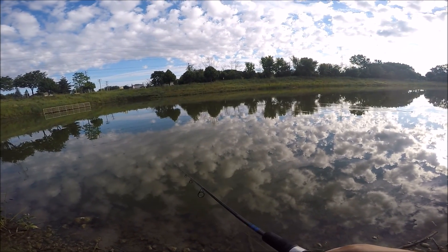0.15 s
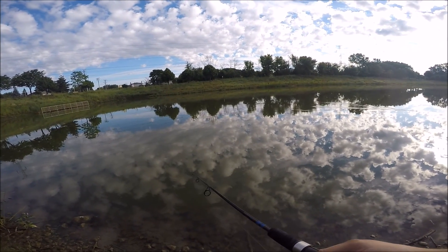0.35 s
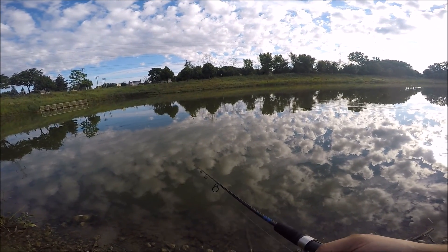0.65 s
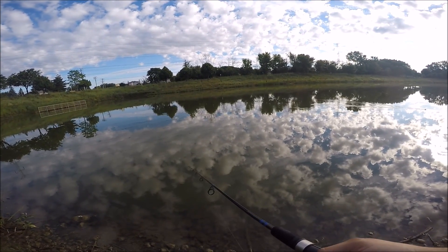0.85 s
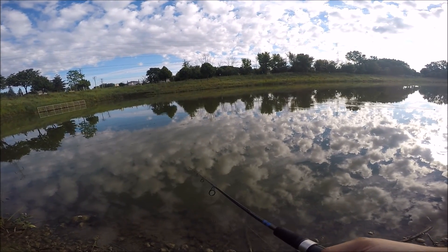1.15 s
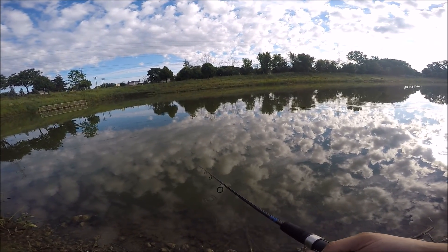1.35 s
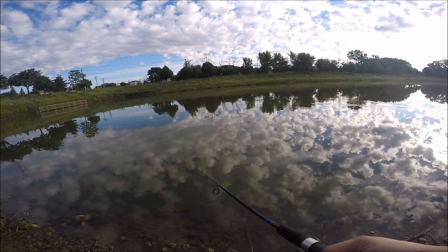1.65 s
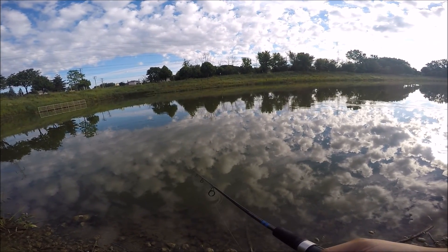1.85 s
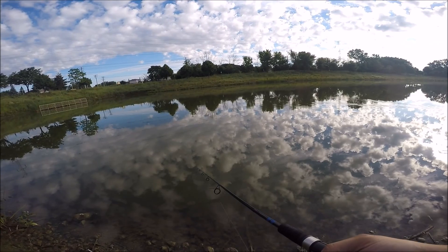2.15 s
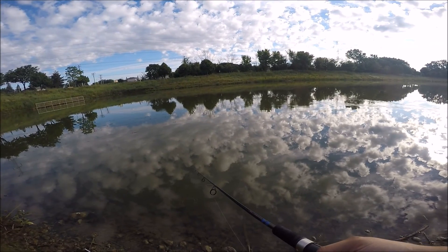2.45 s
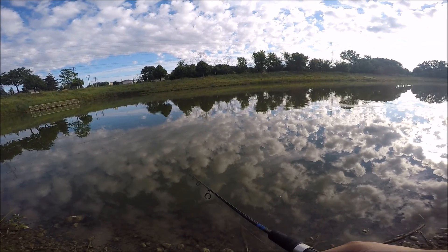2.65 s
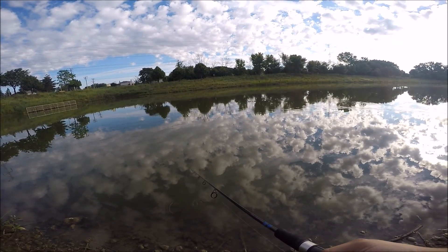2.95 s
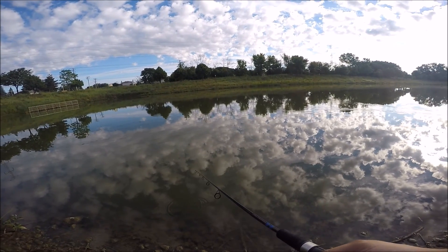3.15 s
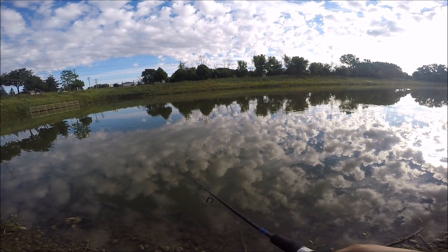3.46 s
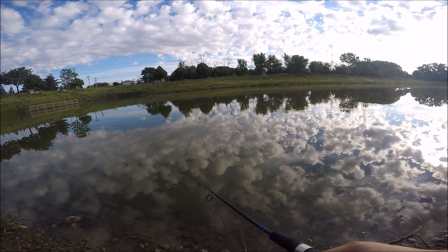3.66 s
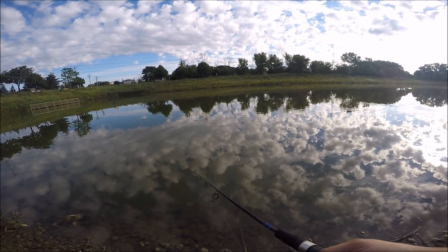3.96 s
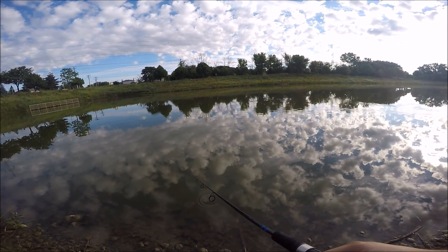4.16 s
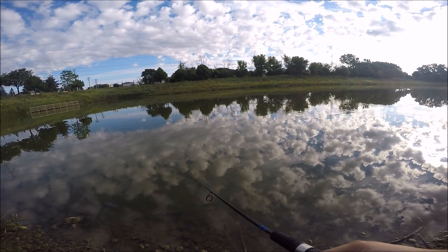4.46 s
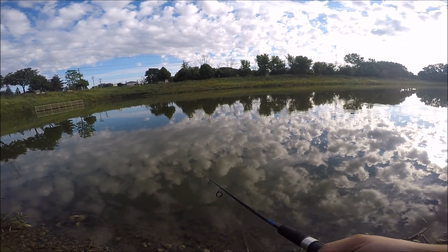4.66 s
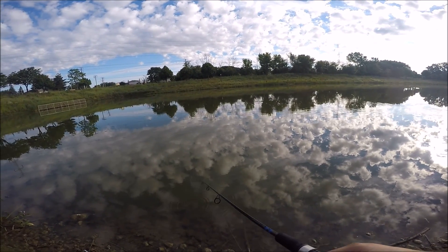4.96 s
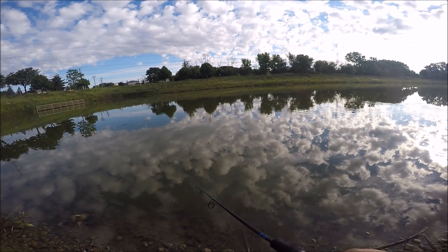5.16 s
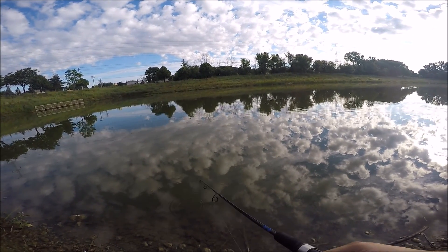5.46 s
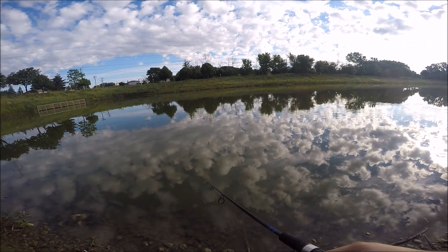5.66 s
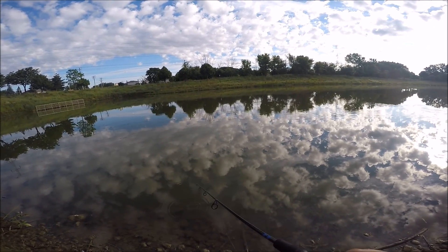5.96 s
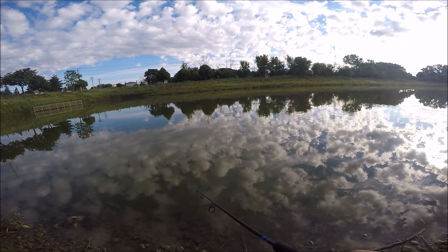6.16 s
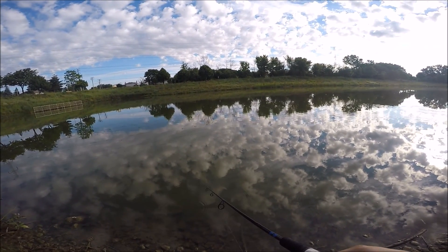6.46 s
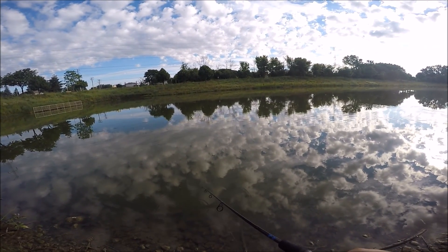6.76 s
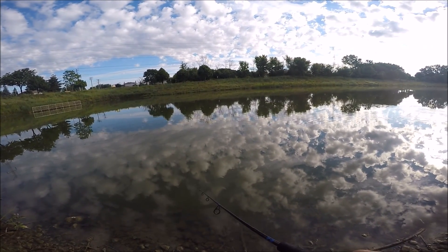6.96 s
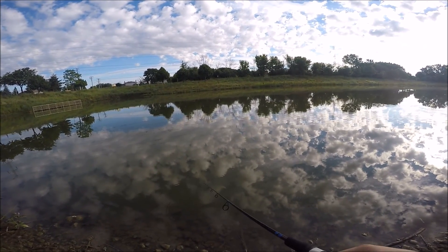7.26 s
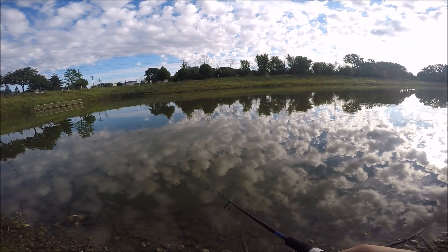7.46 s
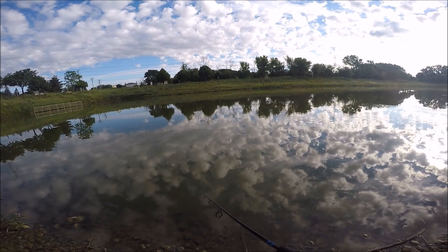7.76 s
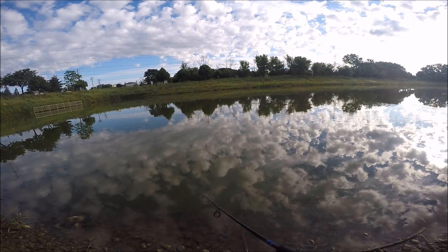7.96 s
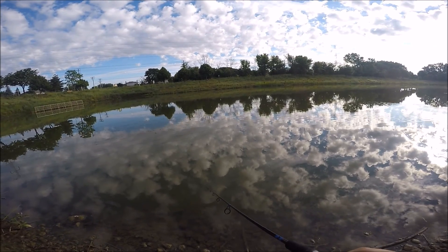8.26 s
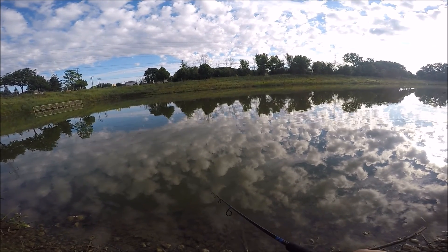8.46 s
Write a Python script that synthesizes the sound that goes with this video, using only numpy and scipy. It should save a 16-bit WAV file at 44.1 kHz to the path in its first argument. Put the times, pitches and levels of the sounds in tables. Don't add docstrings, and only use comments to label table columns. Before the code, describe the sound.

Crickets chirp steadily over a dense insect chorus by a still pond, with a distant bird's falling phrase, low road rumble and small rod ticks.

```python
import sys
import numpy as np
from scipy import signal
from scipy.fft import rfft, irfft, next_fast_len
from scipy.io import wavfile
from scipy.ndimage import uniform_filter1d, map_coordinates

SR = 44100
rng = np.random.default_rng(int(sys.argv[2]) if len(sys.argv) > 2 else 0)


def to_wav(s):
    ch = np.atleast_2d(s).T
    pcm = np.round(np.clip(ch, -1, 1) * 32767)
    wavfile.write(sys.argv[1], SR, pcm.astype(np.int16))


def volts(x):
    e = np.asarray(x, float) / 20
    return 10 ** e


N = 380141

# (time [s], top pitch [Hz], level [dB])
STEADY_CHIRPS = [(.395, 7350, -74), (.785, 7380, -72), (1.18, 7400, -71), (1.98, 7380, -72),
                 (2.4, 7340, -69), (2.835, 7390, -71), (3.246, 7520, -68), (3.69, 7380, -72),
                 (4.091, 7450, -69), (4.485, 7500, -69), (4.96, 7400, -67), (5.41, 7400, -69),
                 (5.865, 7520, -67.5), (6.319, 7490, -67.5), (6.756, 7520, -67), (7.18, 7560, -68),
                 (7.595, 7550, -69), (8.01, 7570, -66.5), (8.422, 7540, -67)]
# (time [s], length [s], top pitch [Hz], level [dB])
FITFUL_CHIRPS = [(.01, .12, 7200, -75), (.235, .05, 7200, -70), (.605, 0.055, 7250, -66),
                 (.685, .13, 7220, -69), (1.005, .05, 7200, -70), (1.361, .14, 7200, -66),
                 (2.475, 0.13, 7110, -69), (3.15, .14, 7170, -72), (4.165, .12, 7170, -72),
                 (4.903, .11, 7180, -72), (5.611, .07, 6730, -67), (7.384, .066, 6750, -67),
                 (7.95, 0.066, 6720, -68), (8.28, .058, 7350, -76), (8.49, .077, 6780, -66),
                 (8.583, .035, 6900, -73)]
# (frequency [Hz], density [dB per Hz])
FAR_CRICKET_SPECTRUM = [(3500, -30), (3950, -12), (4250, -8.5), (4560, -3), (4850, -6), (5050, -5.5),
                        (5250, -2.5), (5800, -9), (6200, -2.5), (6600, -4.5), (7000, -9), (7400, -12),
                        (7800, -15.5), (8300, -57)]
# (time [s], level [dB])
SONGS = [
    (.95, -55.5),
    (2.265, -54.5),
    (4.513, -56.5),
    (6.172, -58.5),
    (7.995, -57.5),
]
# (time from its start [s], length [s], start pitch [Hz], end pitch [Hz], level [dB])
PHRASE = [(.038, .007, 3400, 4000, -12), (.045, 0.0085, 4360, 5050, 2), (.055, .017, 5010, 4496, 5.5),
          (.070, 0.0153, 4244, 3370, -1.5), (.083, .009, 3370, 3950, -4), (.093, .008, 2750, 3100, -5),
          (.104, .02, 3320, 4050, 0.5), (.123, .012, 4100, 3300, -1.5), (.136, .011, 3100, 2640, -6),
          (.143, .007, 3300, 3700, -5), (.151, 0.0112, 2594, 3150, -2.5), (.163, .011, 3000, 2600, -9)]
# (time [s], length [s], start pitch [Hz], end pitch [Hz], level [dB])
WHISTLES = [
    (1.3, .43, 7450, 7270, -76),
    (1.83, .26, 7270, 7330, -73),
    (2.31, .083, 7300, 7260, -83),
]
# (time [s], length [s], start pitch [Hz], end pitch [Hz], level [dB])
PEEPS = [
    (1.828, .016, 2780, 2840, -60),
    (4.004, .014, 2970, 2870, -67),
    (4.862, 0.03, 2460, 2520, -65.5),
    (5.248, .014, 2660, 3050, -61),
]
# (time [s], peak level [dB], pitch [Hz], decay by 20 dB [s])
ROD_TICKS = [
    (1.5499, -47.5, 2570, 0.0035),
    (1.713, -54, 1550, 0.0044),
    (1.72, -55, 2400, .004),
    (2.209, -50, 900, .006),
    (5.0627, -58, 1720, 0.0037),
    (6.4953, -43, 2880, 0.0038),
]
# (time [s], peak level [dB], pitch [Hz], decay by 20 dB [s])
LINE_SNAPS = [
    (1.7559, -55, 13100, 0.0019),
    (3.9105, -61, 11000, 0.002),
    (6.551, -53, 9470, 0.002),
]
# (time [s], peak level [dB], pitch [Hz], decay by 20 dB [s])
GRIP_KNOCK = [
    (3.9079, -39.5, 1943, 0.0046),
    (3.911, -38, 1840, 0.002),
    (3.9095, -52, 1000, .005),
    (3.9112, -41.5, 390, .008),
    (3.9085, -51, 2960, 0.0027),
    (3.911, -48, 13000, 0.0022),
]
# (frequency [Hz], drift [Hz])
PUMP_LINES = [
    (45, 0.883),
    (179, 2.08),
    (372, 4.94),
]
PUMP_LEVELS = [-52.5, -66, -69]
# (time [s], half width [s], rise [dB])
PUMP_SURGES = [
    [(.17, .5, -2), (1.94, .3, 6), (2.93, .2, 6), (4.7, .4, 5), (5.64, .4, 7), (7.1, .8, 6), (8.3, .4, 13)],
    [(1.1, .4, 10), (2.0, .4, 8), (2.73, 0.28, 13), (4.7, 0.19, 12), (5.38, .3, 8.5), (6.26, 0.49, 12),
     (7.32, 0.29, 15), (8.2, 0.43, 12)],
    [(.17, .5, 6), (1.34, .4, 4.5), (3.9, 1.0, 8), (5.3, 0.54, 9), (8.38, .2, 6)],
]
# (frequency [Hz], density [dB per Hz])
RUMBLE_SPECTRUM = [(8.8, -58), (15, -12.5), (32, 1), (49, 1.5), (130, -13.5), (170, -33), (290, -120)]
# (frequency [Hz], density [dB per Hz])
ENGINE_SPECTRUM = [(59, -14), (100, -1.5), (150, -5), (183, -4.5), (298, -9), (363, -12), (457, -13),
                   (620, -30), (810, -69), (1360, -120)]
# (frequency [Hz], density [dB per Hz])
TYRE_SPECTRUM = [(350, -66), (520, -1), (650, 1), (900, -0.5), (1100, -2.5), (1500, -36)]
# (time [s], rise [dB])
WHEEL_BUMPS = [
    (.43, 3.5),
    (.89, 6),
    (1.37, 3),
    (1.92, 10),
    (2.88, 6),
    (4.05, 2.5),
    (5.91, 2.5),
    (7.37, 4.5),
    (8.04, 5),
]
# (time [s], level [dB])
CAR_PASS = [
    (0, -67.5),
    (1.4, -66),
    (2.54, -63.5),
    (3.5, -64.5),
    (4.9, -63.5),
    (5.54, -67.5),
    (6.1, -65.5),
    (6.9, -68),
    (8.62, -67),
]
# (frequency [Hz], density [dB per Hz])
AIR_SPECTRUM = [(530, -15), (900, -14.5), (1260, 1), (1430, 0.5), (1740, -5.5), (2290, -8.5), (2480, -7.5),
                (3910, -11.5), (4200, -8.5), (5460, -15.5), (9240, -120)]
# (frequency [Hz], density [dB per Hz])
HISS_SPECTRUM = [(3000, -60), (4200, 4), (7900, 3.5), (9000, 2), (10500, 0.5), (12500, -0.5), (14000, 0.5),
                 (15300, -2.5)]
GAP_TIMES = [1.426, 2.215, 4.883, 6.013, 8.573]


def unit(x):
    return x / np.sqrt(np.mean(x ** 2) + 1e-20)


def wobble(rate):
    return map_coordinates(rng.standard_normal(2500), [np.arange(N) * rate / SR])


def swells(rows):
    t = np.arange(N) / SR
    return sum(db * np.exp(-2 * ((t - s) / half) ** 2) for s, half, db in rows)


def shape(points):
    f, db = np.transpose(points)
    return lambda hz: volts(np.interp(np.log(hz + 1), np.log(f + 1), db, -120, -120))


def noise(gain, patchy_db):
    z = signal.stft(rng.standard_normal(N + 8192), nperseg=512)[2]
    patches = uniform_filter1d(rng.standard_normal(z.shape), size=5, axis=0)
    patches = uniform_filter1d(patches, size=12, axis=1)
    x = signal.istft(z * volts(patchy_db * unit(patches)), nperseg=512)[1]
    m = next_fast_len(len(x))
    coloured = irfft(rfft(x, m) * gain(np.fft.rfftfreq(m, 1 / SR)), m)
    return unit(coloured[4096:4096 + N])


def scatter(starts, grains):
    at = np.round(np.asarray(starts) * SR).astype(int)[:, None] + np.arange(grains.shape[1])
    keep = (at >= 0) & (at < N)
    return np.bincount(at[keep], grains[keep], N)


def bank_echo(x, t60, db):
    t = np.arange(SR // 2) / SR
    tail = rng.standard_normal(len(t)) * volts(-60 * t / t60)
    return x + volts(db) * signal.fftconvolve(x, tail / np.linalg.norm(tail))[:N]


def strokes(starts, hz, db, length, fall):
    u = np.arange(round(length * SR)) / (length * SR)
    first_phase = rng.random((len(starts), 1))
    turns = first_phase + hz[:, None] * length * (u + fall * (u - u * u) / 2)
    return scatter(starts, volts(db)[:, None] * np.sin(np.pi * u) * np.sin(2 * np.pi * turns))


def near_crickets():
    chirps = [(s, .088, hz, 230, db) for s, hz, db in STEADY_CHIRPS]
    chirps += [(s, length, hz, 50, db) for s, length, hz, db in FITFUL_CHIRPS]
    rows = []
    for s, length, top_hz, arch_hz, db in chirps:
        u = np.arange(0, length - .004, .0122) / length
        luck = rng.standard_normal((2, 20))[:, :len(u)]
        pitch = top_hz - arch_hz * (2 * u - 1) ** 2 + 30 * luck[0]
        swell_db = -26 * (u - .45) ** 2
        rows += zip(s + u * length, pitch, db + 8.0 + swell_db + 0.99 * luck[1])
    return bank_echo(strokes(*np.transpose(rows), length=.008, fall=.045), .15, -7)


def crowd(count, hz, spread_hz, rate, pulses, period, length, fall):
    who = rng.standard_normal((count, 4))
    chirp = np.arange(-1, 30)[None, :, None]
    chirp_start = period * (who[:, :1, None] + chirp * (1 + .1 * who[:, 1:2, None]))
    start = chirp_start + np.arange(pulses) / rate
    luck = rng.standard_normal((2,) + start.shape)
    pitch = hz + spread_hz * np.linspace(-1.6, 1.6, count)[:, None, None] + 70 * luck[0]
    level = 2.8 * who[:, 3:, None] + 3.0 * luck[1]
    return unit(strokes(start.ravel(), pitch.ravel(), level.ravel(), length, fall))


def chorus():
    low = crowd(count=30, hz=4580, spread_hz=165, rate=19.5, pulses=4, period=.42, length=.022, fall=.07)
    high = crowd(count=24, hz=6437, spread_hz=230, rate=82, pulses=8, period=.45, length=0.0085, fall=0.039)
    far = volts(-64.5 + .4 * wobble(1.96)) * noise(shape(FAR_CRICKET_SPECTRUM), patchy_db=0.2)
    return far + volts(-71) * bank_echo(low, 0.22, -2.1) + volts(-73) * bank_echo(high, 0.27, -7.0)


def glides(rows, shift, db, edge):
    out = np.zeros(N + SR)
    for s, length, start_hz, end_hz, level in rows:
        u = np.arange(round(length * SR)) / (length * SR)
        tone = np.sin(2 * np.pi * np.cumsum(start_hz + (end_hz - start_hz) * u) / SR)
        out[round((s + shift) * SR):][:len(u)] += volts(db + level) * np.sin(np.pi * u) ** edge * tone
    return out[:N]


def song(s, db):
    phrase = glides(PHRASE, s, db, edge=0.64)
    slap = glides(PHRASE, s + .035, db - 16.0, edge=0.56)
    flutter = volts(1.5 * wobble(200))
    return bank_echo((phrase + slap) * flutter, .05, -5)


def song_rasp():
    t = np.arange(N) / SR
    puffs = sum(np.clip(1 - np.abs(t - s - .027) / 0.02, 0, 1) * volts(db - 10) for s, db in SONGS)
    return puffs * noise(lambda f: 1 / np.hypot(1, (f - 5350) / 300) ** 3, 0)


def birds():
    thin = glides(WHISTLES, 0, 3, edge=.3) + glides(PEEPS, 0, 0, edge=0.66)
    thin = thin * volts(3.3 * wobble(25.1))
    far = bank_echo(sum(song(s, db) for s, db in SONGS) + song_rasp(), .3, -8)
    return far + bank_echo(thin, 0.16, -9)


def rod():
    s, db, hz, decay_s = np.transpose(ROD_TICKS + LINE_SNAPS + GRIP_KNOCK)[..., None]
    t = np.arange(SR // 20) / SR
    ring = np.sin(2 * np.pi * hz * t)
    ring = ring + 0.78 * np.sin(2 * np.pi * 0.783 * hz * t) + 0.25 * np.sin(2 * np.pi * 1.26 * hz * t)
    onset = (1 - np.exp(-t / 0.00031)) ** 2
    return scatter(s[:, 0], volts(db + 4 - 60 * t / (3 * decay_s)) * onset * ring)


def pump_tone(hz, drift_hz):
    return np.sqrt(2) * np.sin(2 * np.pi * np.cumsum(hz + drift_hz * wobble(6)) / SR)


def pump():
    lines = zip(PUMP_LINES, PUMP_LEVELS, PUMP_SURGES)
    return sum(volts(db - 3 + swells(surges)) * pump_tone(*line) for line, db, surges in lines)


def road():
    t = np.arange(N) / SR
    rumble_db = -44 + swells([(s, 0.077, db) for s, db in WHEEL_BUMPS])
    engines_db = -52.5 - 0.32 * t
    tyres_db = np.interp(t, *np.transpose(CAR_PASS))
    rumble = volts(rumble_db - 1.5) * noise(shape(RUMBLE_SPECTRUM), patchy_db=-0.05)
    engines = volts(engines_db + 2.6) * noise(shape(ENGINE_SPECTRUM), patchy_db=0.7)
    tyres = volts(tyres_db - 0.5) * noise(shape(TYRE_SPECTRUM), patchy_db=1.0)
    return rumble + engines + tyres


def air_and_hiss():
    air = volts(-65) * noise(shape(AIR_SPECTRUM), patchy_db=1.12)
    return air + volts(-72) * noise(shape(HISS_SPECTRUM), patchy_db=.4)


def frame_buzz():
    frame_hz = 60 / 1.001
    frame = np.arange(int(N / SR * frame_hz) + 1)
    luck = rng.standard_normal((len(frame), 2))
    t = np.arange(round(0.0081 * SR)) / SR
    edge = np.clip(np.minimum(t, t[::-1]) / 0.00072, 0, 1)
    hz = 8410 + 62 * luck[:, 1:]
    burst = volts(-71 + 0.61 * luck[:, :1]) * edge * np.sin(2 * np.pi * hz * t)
    return scatter((frame - .29) / frame_hz, burst)


def gaps(x):
    out, half, width = x.copy(), 1024, 20
    band = np.arange(half + 1) // width
    dip = np.cos(np.pi / 2 * np.clip(np.arange(-half, half) / (.016 * SR), -1, 1))
    for s in GAP_TIMES:
        at = slice(round(s * SR) - half, round(s * SR) + half)
        z = rfft(x[at])
        level_db = 10 * np.log10(np.bincount(band, np.abs(z) ** 2) / (half * half) + 1e-20)
        quiet = level_db + rng.normal(0, 3, len(level_db)) < -69
        out[at] -= .8 * dip * irfft(z * quiet[band])
    return out


def scene():
    faint = near_crickets() + chorus() + air_and_hiss() + frame_buzz()
    return (gaps(faint) + birds() + rod() + pump() + road())[None]


def low_pass(x):
    return signal.sosfilt(signal.butter(12, 15510, fs=SR, output="sos"), x)


def record(dry):
    return low_pass(dry)


dry = scene()
out = record(dry)
to_wav(out)
```